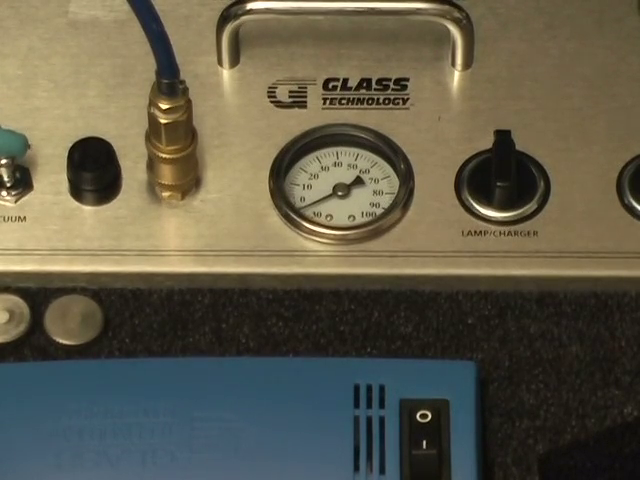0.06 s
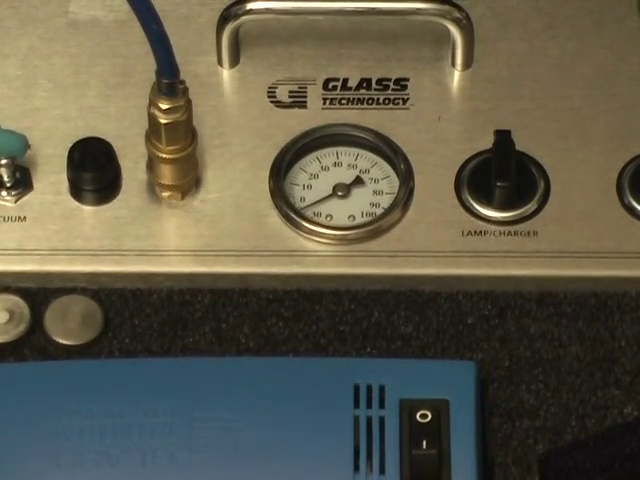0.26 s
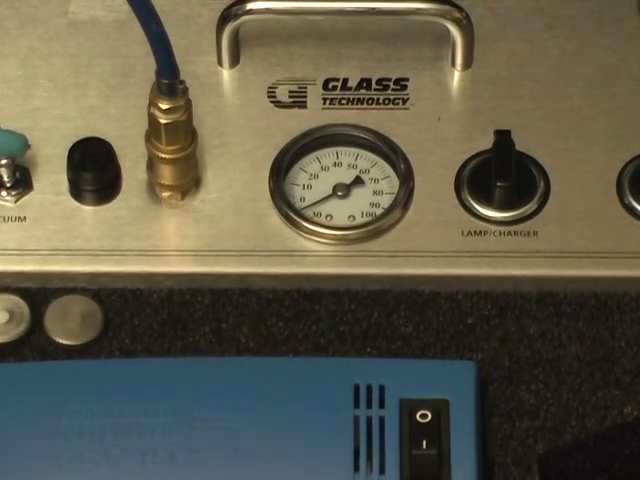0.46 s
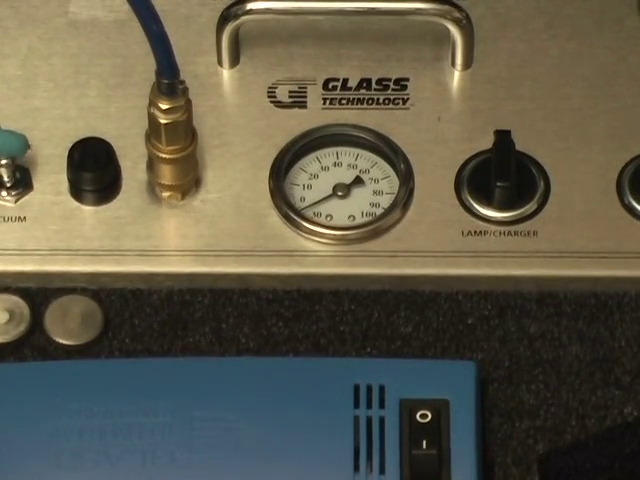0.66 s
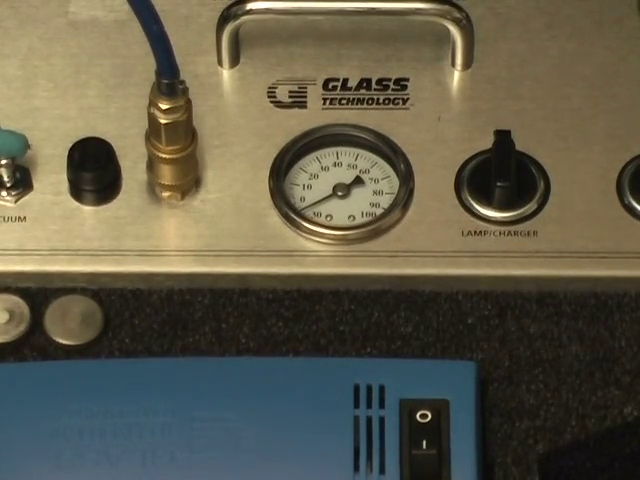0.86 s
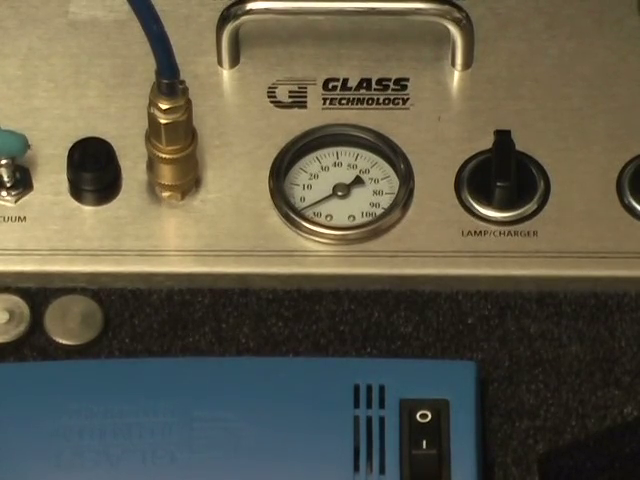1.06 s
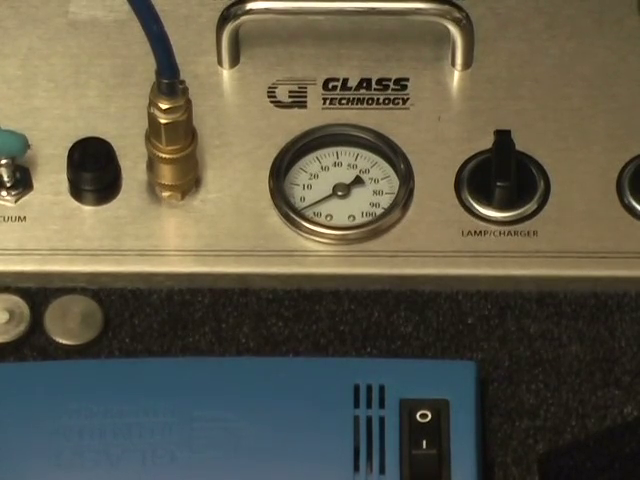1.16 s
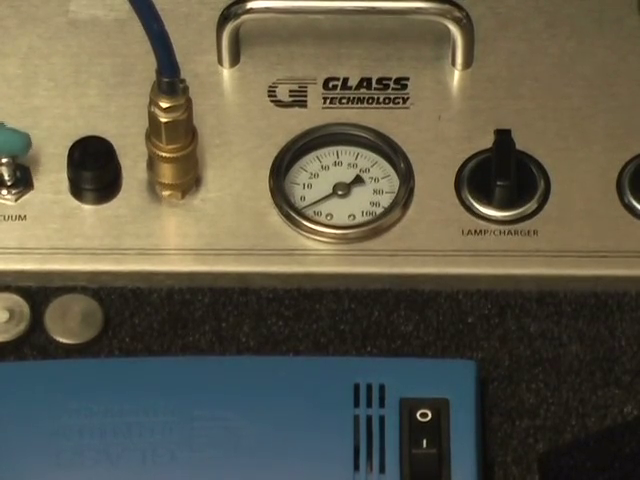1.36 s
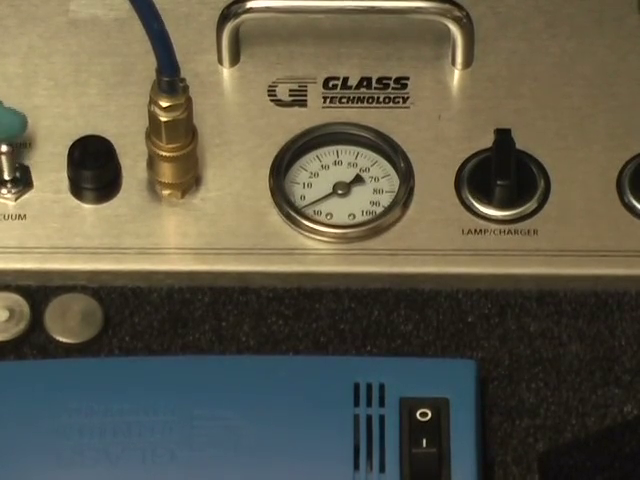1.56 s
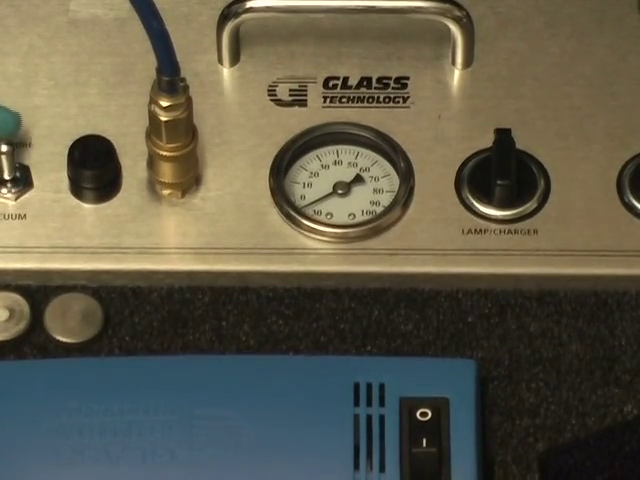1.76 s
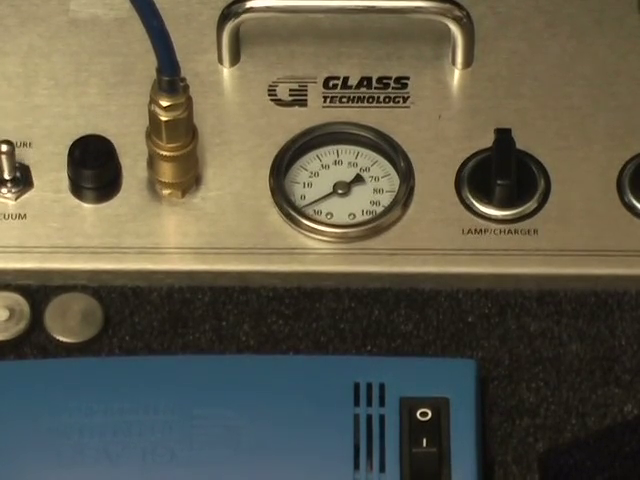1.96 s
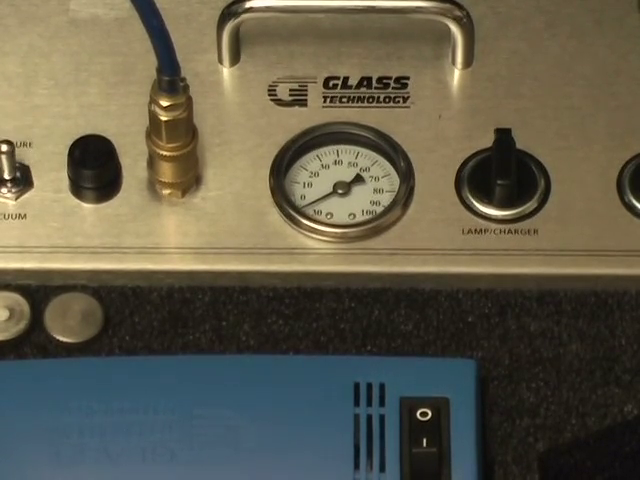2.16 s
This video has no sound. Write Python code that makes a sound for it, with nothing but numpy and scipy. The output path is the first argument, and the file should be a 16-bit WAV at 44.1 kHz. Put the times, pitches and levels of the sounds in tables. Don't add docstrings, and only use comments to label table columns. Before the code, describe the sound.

Small electric vacuum pump buzzes steadily up close, then a switch snaps and it stops.

```python
import sys
import numpy as np
from scipy import signal
from scipy.fft import rfft, irfft, next_fast_len
from scipy.io import wavfile

SR = 44100
rng = np.random.default_rng(int(sys.argv[2]) if len(sys.argv) > 2 else 0)


def gain_from_db(level_db):
    decades = np.asarray(level_db, float) / 20
    return 10 ** decades


def int16_out(signal):
    q = np.round(np.clip(np.atleast_2d(signal).T, -1, 1) * 32767)
    wavfile.write(sys.argv[1], SR, q.astype(np.int16))


N = 97240
T = np.arange(N) / SR
CUT_S = 1.478


def unit(x):
    return x / np.sqrt(np.mean(x ** 2) + 1e-20)


def along(points, hz):
    f, v = np.transpose(points)
    return np.interp(np.log(hz + 1), np.log(f + 1), v)


def wobble(rate_hz, count=1):
    knots = rng.standard_normal((count, int(N * rate_hz / SR) + 2))
    return np.array([np.interp(T * rate_hz, np.arange(len(k)), k) for k in knots])


def fading(start_s, t60_s):
    return gain_from_db(-60 * np.maximum(T - start_s, 0) / t60_s)


def filtered(x, response):
    m = next_fast_len(N + 8192)
    return irfft(rfft(x, m) * response(np.fft.rfftfreq(m, 1 / SR)), m)[..., :N]


def coloured(x, points):
    return filtered(x, lambda hz: gain_from_db(along(points, hz)))


def ringing(x, body):
    def response(f):
        total = 0
        for i, (centre, width, db) in enumerate(body):
            damping = 1j * f * width
            total = total + (-1) ** i * gain_from_db(db) * damping / (centre * centre - f * f + damping)
        return total
    return filtered(x, response)


def bursts(times, levels_db, hold_s, t60_s, same=0):
    length = 2048
    t = np.arange(length) / SR
    scrape = np.sqrt(1 - same) * rng.standard_normal((len(times), length))
    blow = np.sqrt(same * SR * t60_s / np.log(1e6)) * (t == 0)
    level_db = np.c_[levels_db] - 60 * np.maximum(t - np.c_[hold_s], 0) / t60_s
    body = (scrape + blow) * gain_from_db(level_db)
    start = (np.clip(np.c_[times], 0, N / SR) * SR).astype(int)
    at = start + np.arange(length)
    return np.bincount(at.ravel(), body.ravel(), N + 4096)[:N]


# freq_hz, level_db (rms)
MAINS_BUZZ = [(120, -75.5), (240, -60.5), (360, -63), (1080, -80)]
# order (multiple of its turn), level_db (rms)
FAN_ORDERS = [(1, -73), (3, -75), (5, -67.5), (7, -64.5), (8, -67.5), (9, -65), (10, -71.5), (18, -74.5)]
# freq_hz, level_db (rms)
CAMERA_WHINE = [(5696, -82), (7494, -81)]
# freq_hz, level_db (per Hz)
ROOM_TONE = [(18, -49), (30, -12), (307, -13.5), (369, -9), (728, -18), (1020, -20), (1170, -23),
             (7460, -29.5), (15500, -38)]


def background():
    fan_hz = 57.3
    fan = [(k * fan_hz, db) for k, db in FAN_ORDERS]
    hz, db = np.transpose(MAINS_BUZZ + fan + CAMERA_WHINE)[:, :, None]
    phase = 2 * np.pi * (hz * T + rng.random(hz.shape)) + 0.19 * wobble(11, count=len(hz))
    level = np.sqrt(2) * gain_from_db(db + 0.82 * wobble(6, count=len(hz)))
    lines = level * np.sin(phase)
    mid, side = coloured(rng.standard_normal((2, N)), ROOM_TONE) * gain_from_db(0.98 * wobble(7.02))
    side = coloured(side, [(100, -3), (500, -1.5), (3000, -4.5), (12000, -2.0)])
    return lines.sum(0) + gain_from_db(-59.5) * unit(np.array([mid + side, mid - side]))


# freq_hz, t60_s
ROOM_DECAY = [(200, 0.91), (1000, 0.83), (4000, 0.42), (9000, 0.22), (15000, 0.24)]


def room(x):
    width = 0.25
    hz, t, z = signal.stft(rng.standard_normal((2, SR * 2 // 3)), SR, nperseg=256)
    decay = gain_from_db(-60 * t / along(ROOM_DECAY, hz)[:, None])
    mid, side = signal.istft(z * decay, SR, nperseg=256)[1]
    tail = np.array([mid + width * side, mid - width * side]) / np.linalg.norm(mid)
    tail = np.pad(tail, ((0, 0), (200, 0)))
    lead = SR // 2
    warm = np.r_[x[:lead], x]
    return signal.fftconvolve(warm[None], tail, axes=1)[:, lead:lead + N]


# freq_hz, level_db
SNAP_COLOUR = [(500, -26), (1000, -5), (2800, -1.5), (4600, -4), (8000, -7), (12500, -7), (15500, -11)]
# freq_hz, level_db, t60_s
PANEL_MODES = [(993, -8.5, .07), (2811, -5, 0.052), (4490, -11.5, 0.038), (4900, -10, 0.05),
               (5304, 4.5, 0.013), (5960, -8, 0.15), (8145, -8.5, 0.041), (13920, -18, .04)]
# start_s, level_db (peak), length_s
FINGER_TICKS = [(1.517, -65, .004), (1.549, -40, 0.0042), (1.583, -70, .004), (1.6393, -53, .005),
                (1.692, -50.5, 0.0054), (1.775, -57, .004), (1.829, -57, 0.0041), (1.839, -48.5, 0.012),
                (1.862, -56, 0.0042), (1.91, -43, .004), (1.9351, -46.5, .006)]
# freq_hz, level_db
TICK_COLOUR = [(1200, -14), (2200, -6.5), (5500, -2), (9000, -2.5), (12000, -13), (15500, -18)]
# start_s, pitch_hz, level_db, t60_s
SPRING_SQUEAK = (1.508, 14500, -62, .02)


def switch():
    snap_s, snap_db = 1.4258, -29.5
    since = np.maximum(T - snap_s, 0)
    panel = sum(gain_from_db(db - 60 * since / t60) * np.sin(2 * np.pi * hz * since) for hz, db, t60 in PANEL_MODES)
    rattle = bursts([snap_s], [snap_db + 3], [0.0061], t60_s=0.022)
    snap = coloured(rattle, SNAP_COLOUR)
    start_s, level_db, length_s = np.transpose(FINGER_TICKS)
    ticks = coloured(bursts(start_s, level_db, length_s / 2, t60_s=0.017), TICK_COLOUR)
    at, hz, squeak_db, t60 = SPRING_SQUEAK
    squeak = gain_from_db(squeak_db) * fading(at + 0.014, t60) * (T > at) * np.sin(2 * np.pi * hz * T)
    return squeak + gain_from_db(-27.5) * panel + snap + ticks


# time_s, speed_turns_per_s
MOTOR_SPEED = [(0.0, 67.4), (0.592, 67.7), (1.45, 67.7)]


def shaft():
    slap_at_s, sag_per_s = .8452, 1.2
    sag = np.clip(1 - sag_per_s * np.maximum(T - CUT_S, 0), .1, 1)
    speed = np.interp(T, *np.transpose(MOTOR_SPEED)) * sag
    turns = np.cumsum(speed) / SR
    return turns - np.interp(slap_at_s, T, turns)


# order (multiple of the turn), level_db
THUMP_ORDERS = [(1, -18), (2, -17), (3, 0), (4, -1.5), (5, -2.5), (6, -13.5), (7, -11), (8, -10.5),
                (9, -18), (10, -14.5), (11, -11.5), (12, -23), (13, -11), (14, -13.5), (15, -27.5),
                (16, -14), (17, -23.5), (18, -29), (19, -15), (20, -17.5), (21, -19), (22, -23.5),
                (23, -36), (24, -19.5), (25, -20.5), (26, -29), (27, -17.5), (28, -29), (29, -32),
                (30, -15.5), (31, -32), (32, -21.5), (33, -37.5), (34, -27.5), (35, -40), (36, -31)]
# freq_hz, level_db
EARLY_COLOUR = [(900, -0.5), (1350, 5.5), (1550, 0.5), (1900, -6), (2400, 5.5)]
# freq_hz, width_hz, level_db
CASE_MODES = [(69, 22, -5), (223, 30, 1.5), (340, 60, 2), (546, 170, -5), (808, 50, -4.5), (1016, 94, -3),
              (1920, 610, -13.5), (5660, 780, -19)]


def thump(turns):
    lag_turns, settle_s = .44, 0.43
    k, db = np.transpose(THUMP_ORDERS)
    many_parts = k > 5.5

    cepstrum = irfft(np.log(gain_from_db(np.r_[db[0] - 20, db, -40])))
    cepstrum[len(k) + 2:] = 0
    cepstrum[1:len(k) + 1] *= 2
    phase = rfft(cepstrum).imag[1:-1] + 2 * np.pi * rng.random(len(k)) * many_parts

    drift_db = 1.1 * wobble(2.34, count=len(k))
    flutter_db = 0.94 * wobble(30, count=len(k))
    sway_db = (drift_db + flutter_db) * np.sqrt(k[:, None] / 20)
    mean_speed = np.mean(MOTOR_SPEED, axis=0)[-1]
    sway_db += along(EARLY_COLOUR, k * mean_speed)[:, None] * np.exp(-(T / settle_s) ** 2)

    parts = np.where(many_parts[:, None], fading(1.449, 0.16), 1)
    waves = np.cos(2 * np.pi * k[:, None] * (turns - lag_turns) + phase[:, None])
    orders = unit((parts * gain_from_db(db[:, None] + sway_db) * waves).sum(0))
    strokes = gain_from_db(-36.5) * orders * fading(CUT_S, 0.18)

    shudder_s = 1.474
    shake = unit(ringing(rng.standard_normal(N), CASE_MODES)) * gain_from_db(-39.5 + 3 * wobble(35.03)[0])
    rise = np.clip((T - shudder_s) / 0.041 + 1, 0, 1)
    return strokes + shake * rise * fading(shudder_s, 0.72)


# freq_hz, width_hz, level_db
VALVE_PLATE = [(3403, 500, -2), (5040, 400, -10), (7220, 380, -6.5), (8380, 490, -1), (9300, 460, -5),
               (10090, 480, -3.5), (11130, 420, -6.5), (13200, 1400, -18.5)]
# freq_hz, width_hz, level_db
REED_MODES = [(5700, 120, -11), (5820, 45, -4), (5960, 60, -5), (6210, 60, 2), (6285, 50, 1),
              (6700, 120, -11), (7850, 100, -10)]
# freq_hz, level_db (per Hz)
AIR_COLOUR = [(80, -29), (170, -20), (370, -0.5), (600, -14), (1000, -11), (2480, -19), (6500, -16),
              (15500, -44.5)]
# freq_hz, level_db
LID_COLOUR = [(2800, 0), (3700, -1), (4150, -6), (4700, 0), (11500, -0.5), (15500, 0.5)]


def pump(turns):
    slap_t60_s, clean_share = .012, .6
    whole = np.arange(np.ceil(turns[0]), turns[-1])
    no_hold = 0 * whole

    def moments(lag_turns):
        return np.interp(whole + lag_turns, turns, T) + .00005 * rng.standard_normal(len(whole))

    def scatter_db():
        return 0.8 * rng.standard_normal(len(whole))

    slap = bursts(moments(0), scatter_db(), no_hold, slap_t60_s, clean_share)
    slap += bursts(moments(.49), scatter_db() - 11.5, no_hold, slap_t60_s)
    slap = gain_from_db(-50.5) * unit(ringing(slap, VALVE_PLATE)) * fading(1.455, 0.032)

    plucks = bursts(moments(-.12), scatter_db(), no_hold, 0.036, clean_share / 2)
    reed = gain_from_db(-49.5) * unit(ringing(plucks, REED_MODES))

    pulse = 1 + 0.36 * np.cos(2 * np.pi * (turns - .1))
    air = unit(coloured(rng.standard_normal(N), AIR_COLOUR)) * pulse * gain_from_db(1.4 * wobble(11.75)[0])
    return coloured(slap + (reed + gain_from_db(-47.5) * air) * fading(1.455, .2), LID_COLOUR)


# freq_hz, level_db (side over mid)
NEAR_WIDTH = [(60, -24), (200, -17), (600, -14), (4000, -14), (9000, -15.5), (14000, 1)]


def scene():
    turns = shaft()
    body = thump(turns)
    bright = pump(turns) + switch()
    near = body + bright
    side = coloured(np.roll(near, 9), NEAR_WIDTH) * gain_from_db(-4.5)
    wet = room(bright + gain_from_db(-15.5) * body)
    return np.array([near + side, near - side]) + gain_from_db(-6) * wet + background()


def band_limit(x):
    return signal.sosfilt(signal.butter(12, 15790, fs=SR, output="sos"), x)


# freq_hz, level_db (left over right)
PORT_LEAN = [(50, 0.8), (500, -1.3), (2000, 2), (5000, 0), (9000, -0.5), (14000, 0.8)]


def record(dry):
    low_hz, top_hz = 48, 15800

    def ports(hz):
        lean = gain_from_db(along(PORT_LEAN, hz) * np.c_[[.5, -.5]])
        return lean * (hz < top_hz) / (1 + (low_hz / (hz + 1)) ** 6)

    return band_limit(filtered(dry, ports))


dry = scene()
out = record(dry)
int16_out(out)
```